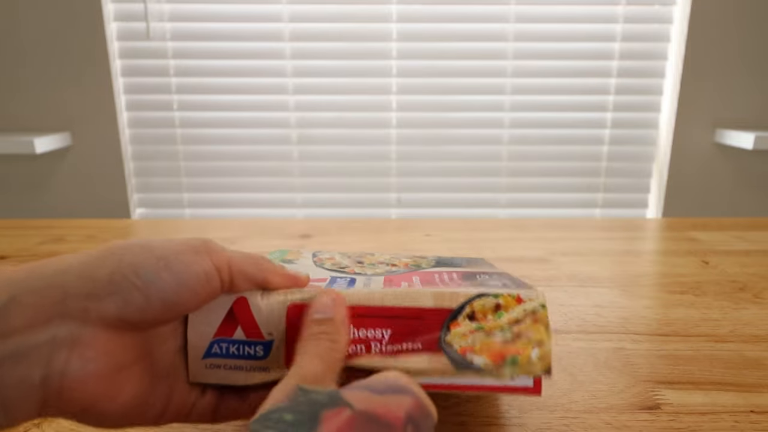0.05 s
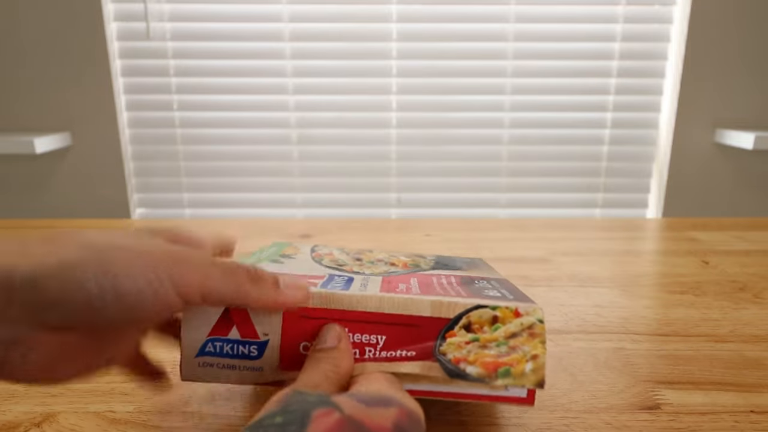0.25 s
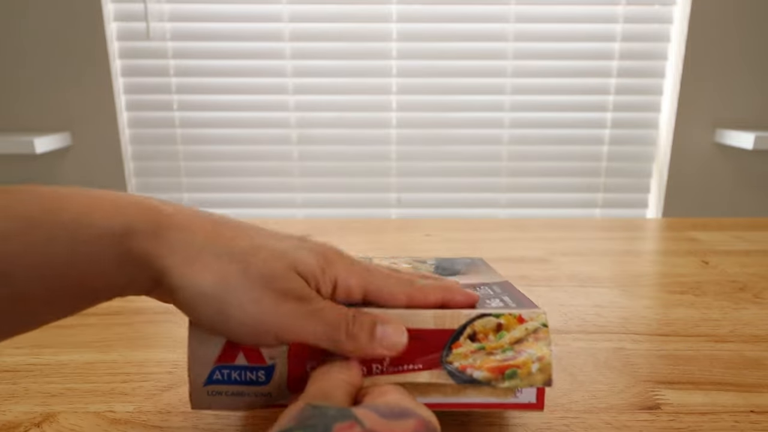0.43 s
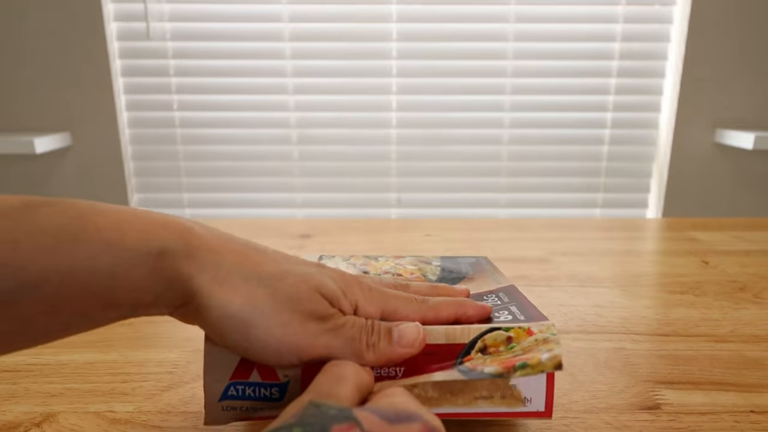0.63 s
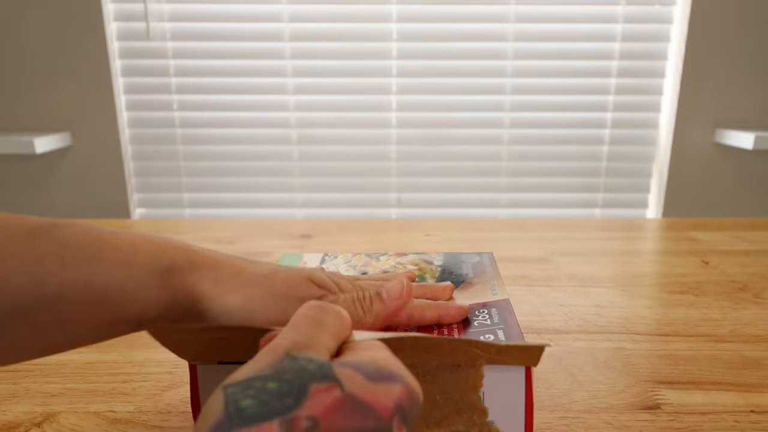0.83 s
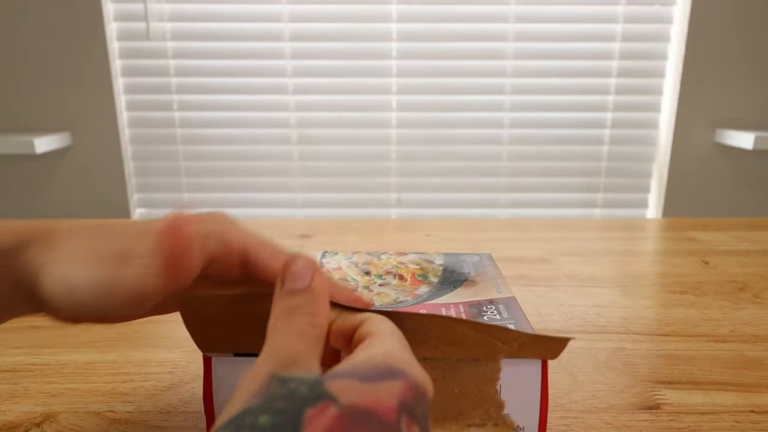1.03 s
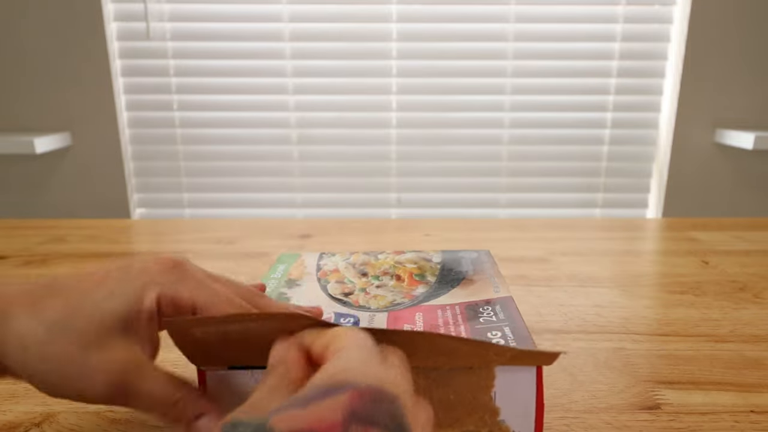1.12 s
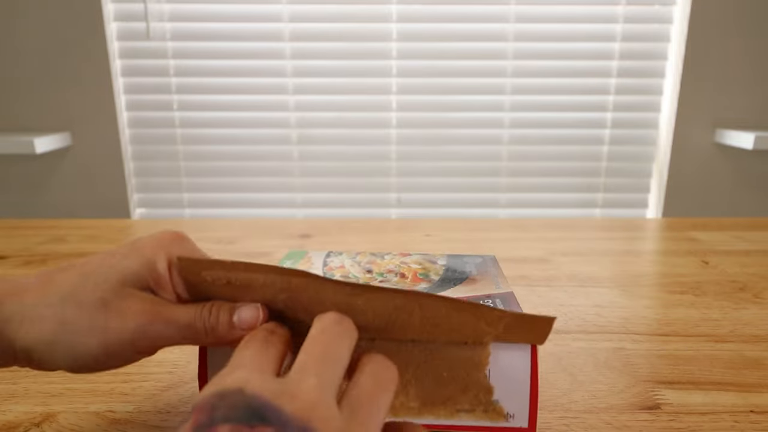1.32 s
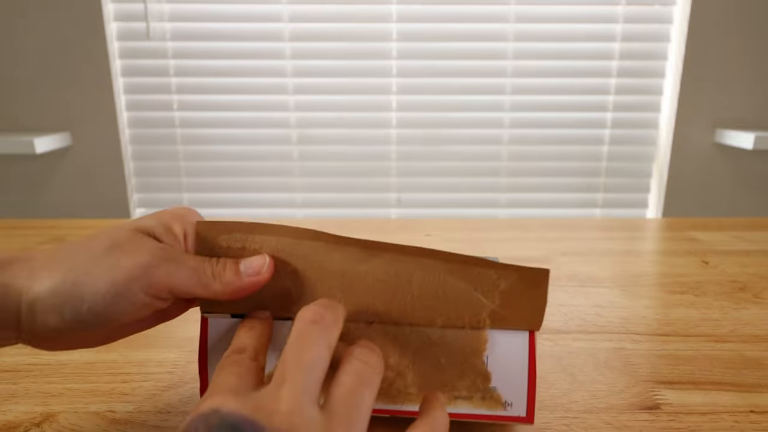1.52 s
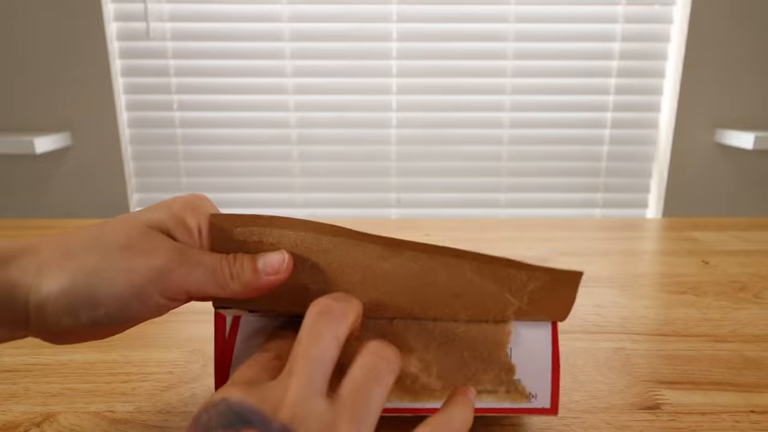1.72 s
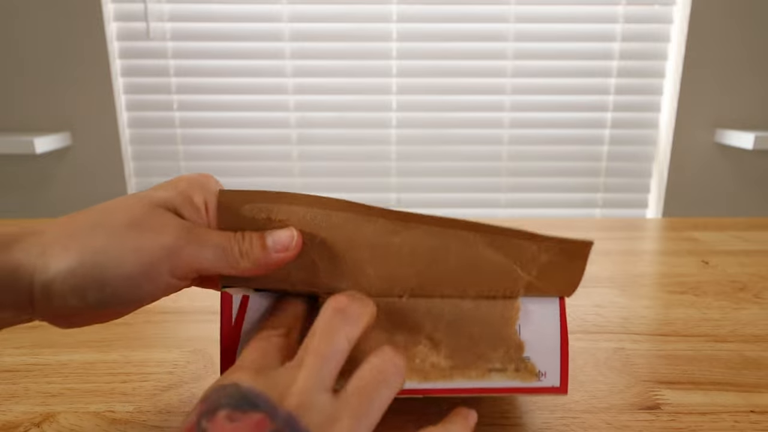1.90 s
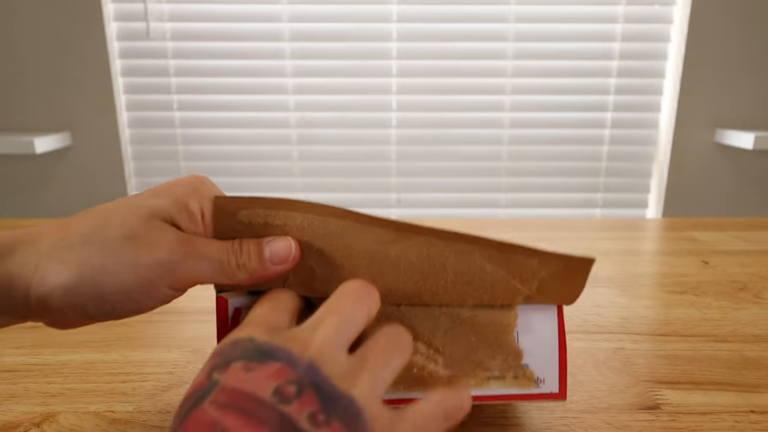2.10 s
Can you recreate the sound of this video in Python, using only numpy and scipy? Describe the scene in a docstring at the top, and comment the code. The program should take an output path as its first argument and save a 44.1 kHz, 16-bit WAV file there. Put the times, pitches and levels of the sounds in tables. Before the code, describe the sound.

A small cardboard box is torn open by hand with snaps, hollow pops and short rips.

```python
"""A faint creak over a quiet hush, then snaps and hollow pops: a small cardboard box is torn open by hand.
It lies on a table in a quiet room, close to the microphone. The glued seam snaps in ticks that shake the box modes,
buckling walls ring as short damped tones, and the table takes low pushes. Rips and finger scrapes are
shaped crackle, the freed flap twangs in close beating modes, and the room answers with a decaying tail."""
import sys
import numpy as np
from scipy import signal
from scipy.fft import rfft, irfft, next_fast_len
from scipy.io import wavfile
from scipy.ndimage import uniform_filter1d, map_coordinates

SR = 44100
rng = np.random.default_rng(int(sys.argv[2]) if len(sys.argv) > 2 else 0)


def makeup_ratio(level_db):
    """Linear amplitude ratio for a level in decibels (20 dB per factor of ten)."""
    decades = np.asarray(level_db, float) / 20
    return 10 ** decades


def dump_mix(stems):
    """Bounce the given channels to the path in sys.argv[1] as a 16-bit WAV at rate SR."""
    frames = np.atleast_2d(stems).T  # one column per channel
    limited = np.clip(frames, -1, 1)  # hard clip at full scale
    pcm = np.round(limited * 32767).astype(np.int16)
    wavfile.write(sys.argv[1], SR, pcm)


N = 94815  # samples


def unit(x):
    """Scale to rms 1."""
    return x / np.sqrt(np.mean(x ** 2) + 1e-20)


def along(points, hz):
    """Read (frequency [Hz], value) points on a log frequency axis."""
    f, v = np.transpose(points)
    return np.interp(np.log(hz + 1), np.log(f + 1), v)


def filtered(x, response):
    """Multiply the spectrum of x by a complex response of frequency."""
    m = next_fast_len(len(x) + 8192)
    return irfft(rfft(x, m) * response(np.fft.rfftfreq(m, 1 / SR)), m)[:len(x)]


def wobble(rate):
    """A smooth random curve, rate knots a second; zero once its 400 knots run out."""
    return map_coordinates(rng.standard_normal(400), [np.arange(N) * rate / SR])


def add(track, s, sound):
    """Mix a sound into the track at time s [s]."""
    part = track[max(round(s * SR), 0):][:len(sound)]
    part += sound[:len(part)]


def ring(hz, t60, attack, phase=0, size=SR // 8):
    """One damped mode: a sine with a soft attack [s] that falls 60 dB in t60 [s]."""
    t = np.arange(size) / SR
    return np.sin(2 * np.pi * hz * t + phase) * makeup_ratio(-60 * t / t60) * (1 - np.exp(-t / attack))


def crackle(per_s, spread_db, hiss):
    """Fibres breaking: sparse impulses of uneven size over a hiss."""
    happens, sign, rarity = rng.random((3, N))
    size = makeup_ratio(-spread_db * np.log(rarity + 1 / 30))
    impulses = (happens < per_s / SR) * np.sign(sign - .5) * size
    return unit(unit(impulses) + hiss * rng.standard_normal(N))


def patchy(x, depth_db):
    """Random patches of gain in time and frequency."""
    z = signal.stft(x, nperseg=256)[2]
    field = uniform_filter1d(rng.standard_normal(z.shape), size=15, axis=0)
    field = uniform_filter1d(field, size=4, axis=1)
    return signal.istft(z * makeup_ratio(depth_db * unit(field)), nperseg=256)[1][:N]


# spectrum of the quiet room's hush: (frequency [Hz], relative density [dB per Hz])
AIR_SPECTRUM = [(15, -36), (50, 0), (236, -2.5), (1200, -24), (2110, -19), (4740, -22.5), (7110, -25),
                (16000, -49.5)]
AIR_DB = -46.5


def air():
    """The steady hush of the room: coloured noise with a slight slow drift in level."""
    hush = unit(filtered(rng.standard_normal(N), lambda f: makeup_ratio(along(AIR_SPECTRUM, f))))
    return makeup_ratio(AIR_DB + 0.27 * wobble(2.82)) * hush


# how long the room rings: (frequency [Hz], t60 [s])
ROOM_DECAY = [(150, 1), (1000, 0.44), (4000, 0.67), (9000, 0.41), (16000, 0.39)]
NEAR_DB, NEAR_T60_S = -3.5, 0.11


def room(x):
    """Table and near walls answer first; then each frequency of the room dies at its own speed."""
    hz, t, z = signal.stft(rng.standard_normal(SR), SR, nperseg=256)
    far = makeup_ratio(-60 * t / along(ROOM_DECAY, hz)[:, None])
    near = makeup_ratio(NEAR_DB - 60 * t / NEAR_T60_S)
    tail = signal.istft(z * (far + near), SR, nperseg=256)[1]
    delayed = np.pad(x, (200, 0))
    return signal.fftconvolve(delayed, tail / np.linalg.norm(tail))[:N]


# resonances of the hollow box: (frequency [Hz], width [Hz], level [dB])
BOX_MODES = [(180.6, 40, -5), (350, 20, -3.5), (431, 76, -4), (571, 66, 0), (686, 63, 1.5), (849, 360, -4),
             (1084, 220, 1.5), (1324, 430, -3.5)]


def box(f):
    """The resonances of the hollow box: band-pass modes of alternating sign."""
    total = 0
    for k, (centre, width, db) in enumerate(BOX_MODES):
        damping = 1j * f * width
        total = total + (-1) ** k * makeup_ratio(db) * damping / (centre ** 2 - f ** 2 + damping)
    return total


# course of the creak of the bending box: (time [s], level [dB])
CREAK_LEVEL = [(0, -39), (0.068, -54.5), (.1, -36), (.2, -50), (.25, -39.5), (.38, -47.5), (.41, -35.5),
               (.58, -32), (.64, -43), (.8, -35.5), (1, -48), (1.3, -47.5), (1.45, -52), (1.5, -44.5),
               (1.63, -52), (1.7, -40), (1.85, -42), (1.9, -48), (2.03, -39), (2.15, -48.5)]


def creak():
    """Small slips of the bending board ring the box all along."""
    s, db = np.transpose(CREAK_LEVEL)
    slips = unit(filtered(crackle(700, 3.2, 0.39), box))
    return makeup_ratio(np.interp(np.arange(N) / SR, s, db) + 0.68 * wobble(29.29)) * slips


# modes of the freed flap on the box: (frequency [Hz], level [dB, under FLAP_DB], t60 [s])
FLAP_MODES = [(199.5, 0, .26), (188.6, -1.3, .27), (206.5, -20, 1.05), (106, -28, 1.6), (158, -24, .9),
              (186, -28, 3)]
FLAP_S, FLAP_DB, FLAP_ATTACK_S = .808, -8, .006


def flap():
    """The freed flap twangs; flap and box swing against each other, so the tone swells and beats."""
    twang = np.zeros(SR)
    for k, (hz, db, t60) in enumerate(FLAP_MODES):
        twang += (-1) ** k * makeup_ratio(db) * ring(hz, t60, FLAP_ATTACK_S, size=SR)
    out = np.zeros(N)
    add(out, FLAP_S, makeup_ratio(FLAP_DB) * twang)
    return out


# low pushes on the table: (time [s], level [dB], pitch [Hz])
TABLE_PUSHES = [(.095, -31, 194), (0.245, -18, 197), (0.399, -11.5, 176), (.489, -16, 122),
                (0.792, -14, 127), (1.065, -21, 206)]


def pushes():
    """The table takes low pushes, each one short damped tone."""
    out = np.zeros(N)
    for s, db, hz in TABLE_PUSHES:
        add(out, s, makeup_ratio(db) * ring(hz, .05, 0.0031))
    return out


LAG_S = 0.001112  # from a listed time to the onset of a pop or snap
# walls buckling: (time [s], level of the main tone [dB], pitch [Hz], t60 [s])
WALL_POPS = [(0.077, -27, 695, 0.032), (0.091, -18, 1094, 0.021), (0.098, -20, 570, 0.034),
             (0.149, -22.5, 630, 0.042), (0.239, -9.5, 610, 0.028), (0.27, -20, 604, 0.03),
             (0.3375, -22, 520, 0.04), (0.394, -1.5, 729, 0.025), (0.4, -6, 560, 0.018),
             (0.455, -16, 700, 0.014), (0.553, -16.5, 620, 0.016), (0.573, -2.5, 718, 0.015),
             (0.813, -7.5, 600, 0.03), (1.063, -19, 582, 0.028), (1.248, -32, 1000, .03),
             (1.491, -27.5, 1200, 0.025), (1.755, -11, 620, 0.02)]


def pops():
    """A buckling wall rings a few ragged cycles near its own pitch, with a tone above and one below."""
    out = np.zeros(N)
    for s, db, hz, t60 in WALL_POPS:
        near = rng.normal(0, 1, 5)
        main = ring(hz, t60, 0.00073)
        upper = ring(hz * (1.438 + 0.077 * near[0]), t60, 0.0012, 3 * near[1])
        lower = ring(hz * (0.52 + 0.1 * near[2]), 1.13 * t60, 0.0016, 3 * near[3])
        roughness = 3 * uniform_filter1d(rng.standard_normal(SR // 8), size=10)
        rag = ring(2600 + 300 * near[4], .5 * t60, .0004) * roughness
        add(out, s + LAG_S, makeup_ratio(db) * (main + 0.37 * upper + 0.7 * lower + .2 * rag))
    return out


# glue and fibre snaps: (time [s], level [dB, before SNAP_GAIN_DB and the filter])
SEAM_SNAPS = [(0.0784, -31), (0.0897, -21), (0.2404, -28), (0.2464, -24), (0.2703, -24), (0.2922, -27),
              (.3105, -33), (.3152, -31), (0.3356, -32), (0.3661, -27.5), (0.3945, -25), (0.4309, -22),
              (0.4404, -24), (0.4559, -20), (0.4664, -22), (0.4753, -22), (0.4854, -27), (0.5142, -21),
              (0.5257, -18), (0.5397, -16), (0.5544, -21), (0.5736, -16), (1.0774, -31), (1.1722, -39),
              (1.2051, -38), (1.2476, -33), (1.2954, -31), (1.324, -35), (1.358, -35), (1.4426, -37),
              (1.4686, -30), (1.4734, -28), (1.6447, -38), (1.6596, -33), (1.6921, -26), (1.7174, -27),
              (1.7305, -29), (1.8701, -29), (1.8801, -25), (1.9395, -26), (2.083, -27), (2.0994, -27)]
SNAP_GAIN_DB, THUMP_DB, SNAP_T60_S = 12, 6.5, 0.006


def snaps():
    """Each snap is a bright tick with a ragged tail that also shakes the box."""
    ticks, t = np.zeros(N), np.arange(400) / SR
    for s, db in SEAM_SNAPS:
        tail = 0.73 * np.sign(rng.standard_normal(len(t))) * makeup_ratio(-60 * t / SNAP_T60_S)
        add(ticks, s + LAG_S, makeup_ratio(db + SNAP_GAIN_DB) * (tail + (t == 0)))

    def edge(f):
        """The bright part: the band around 1500-5000 Hz."""
        return 1j * f / 1500 / (1 + 1j * f / 1500) / (1 + 1j * f / 5000) ** 2

    return filtered(ticks, lambda f: edge(f) + makeup_ratio(THUMP_DB) * box(f))


# colour of torn board before each stroke's tilt: (frequency [Hz], relative density [dB per Hz])
RIP_SPECTRUM = [(120, -6), (200, -14), (1160, -6), (2400, -4.5), (3560, -5.5), (8420, -8.5), (9750, -17.5),
                (14900, -22.5), (16000, -51)]
# rips and scrapes: (time when loudest [s], level [dB], time to rise 10 dB [s], hold [s],
# time to fall 10 dB [s], tilt [dB per octave])
RIP_STROKES = [(.091, -29.5, .0003, .003, .0015, -2.5), (0.15, -30, 0.02, 0.006, 0.016, 2.5),
               (0.2405, -29, 0.0005, 0.003, 0.009, -6), (0.3955, -21.5, 0.0005, 0.003, 0.013, -7.5),
               (0.573, -37.5, 0.046, 0.012, 0.023, 4.5), (0.655, -35, 0.04, 0.065, 0.086, 2.5),
               (0.776, -35, 0.047, 0.0044, .004, 4), (0.7882, -7, 0.0005, 0.0031, 0.0048, 1),
               (0.806, -11.5, 0.014, 0.0091, 0.0005, 1), (1.292, -38.5, 0.017, 0.021, 0.039, -2.5),
               (1.468, -41, 0.002, 0.062, 0.015, .3), (1.572, -46, 0.01, .018, 0.006, -6),
               (1.692, -38.5, 0.013, 0.0033, 0.045, -1.8), (1.749, -21.5, 0.0045, 0.0035, 0.003, 2.1),
               (1.756, -17.5, 0.003, .012, 0.011, .5), (1.8, -38, 0.01, .045, 0.012, 0.3),
               (1.925, -38, 0.005, 0.0047, 0.022, -4.2), (2.007, -31.5, 0.014, 0.024, 0.045, -.8),
               (2.067, -35.5, 0.021, 0.028, 0.0026, 8)]
GRAINS_PER_S, GRAIN_SPREAD_DB, HISS_SHARE, PATCHY_DB = 3000, 4, 0.7, 2


def strokes():
    """Ripping and scraping: crackle under a rise, hold and fall, brighter or duller for each stroke."""
    out, t = np.zeros(N), np.arange(N) / SR
    fibres = patchy(crackle(GRAINS_PER_S, GRAIN_SPREAD_DB, HISS_SHARE), PATCHY_DB)
    source = fibres * makeup_ratio(1.3 * wobble(220))
    for s, db, rise, hold, fall, tilt_db in RIP_STROKES:
        before = np.clip(s - t, 0, None)
        after = np.clip(t - s - hold, 0, None)
        shape = makeup_ratio(-10 * (before / rise + after / fall))
        a, b = max(round(s * SR) - SR // 3, 0), round(s * SR) + SR // 3
        tone = filtered(source[a:b], lambda f: makeup_ratio(along(RIP_SPECTRUM, f) + tilt_db * np.log2((f + 400) / 3000)))
        # the spread of the shape keeps short and long strokes comparable
        out[a:b] += makeup_ratio(db) * np.std(shape[a:b]) * unit(shape[a:b] * tone)
    return out


ROOM_DB, BASS_HZ = -11.5, 90


def scene():
    """Box sounds (with the deep bass cut away), their room, the creak, the flap and the hush."""
    close = snaps() + pops() + pushes() + strokes()
    hands = filtered(close, lambda f: (1j * f / (BASS_HZ + 1j * f)) ** 2)
    return (air() + makeup_ratio(ROOM_DB) * room(hands) + creak() + flap() + hands)[None]


def band_limit(x):
    """A steep low-pass at the top of the band."""
    return signal.sosfilt(signal.butter(12, 16310, fs=SR, output="sos"), x)


def record(dry):
    """Band limit (soft below 45 Hz, sharp at 15.8 kHz) and full-scale clip."""
    limited = filtered(dry[0], lambda f: (f < 15800) * (1j * f / (45 + 1j * f)) ** 2)
    mix = np.clip(limited, -1, 1)[None]
    return band_limit(mix)


dry = scene()
out = record(dry)
dump_mix(out)
```